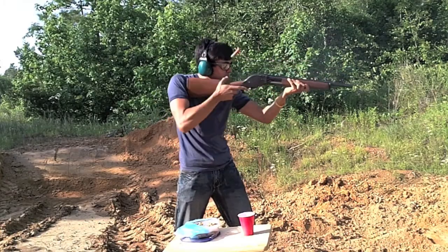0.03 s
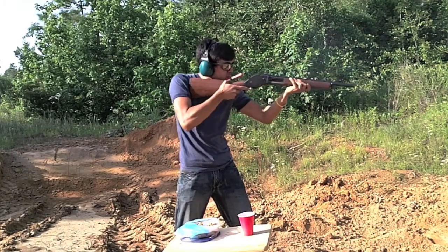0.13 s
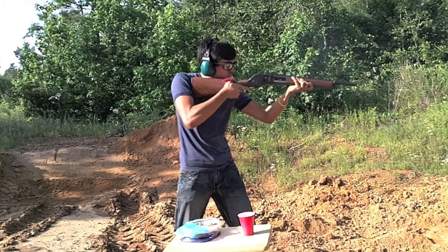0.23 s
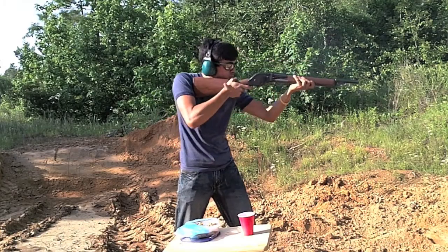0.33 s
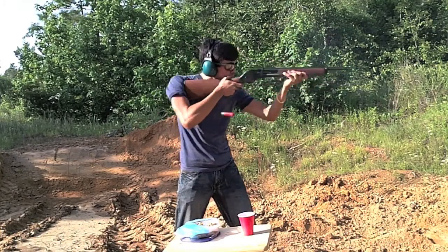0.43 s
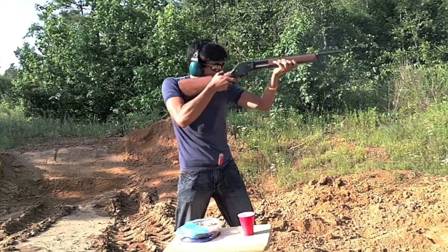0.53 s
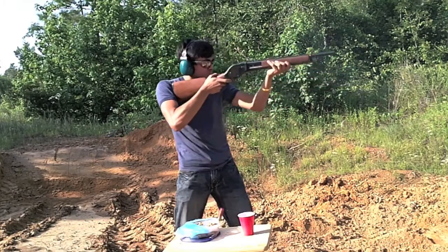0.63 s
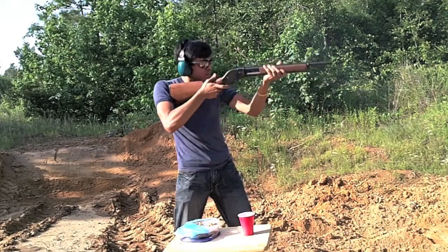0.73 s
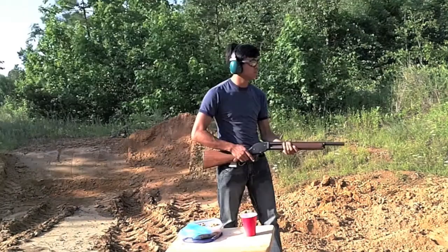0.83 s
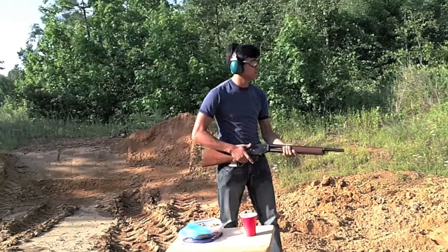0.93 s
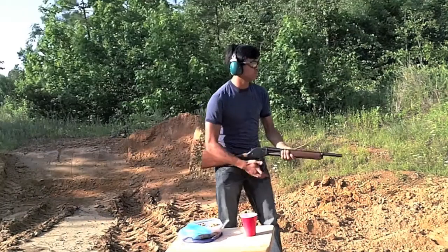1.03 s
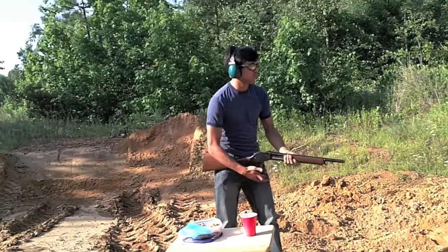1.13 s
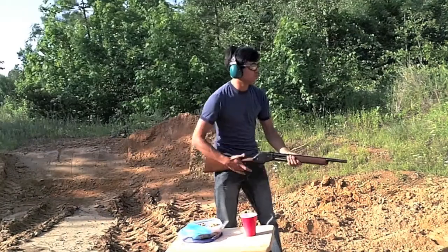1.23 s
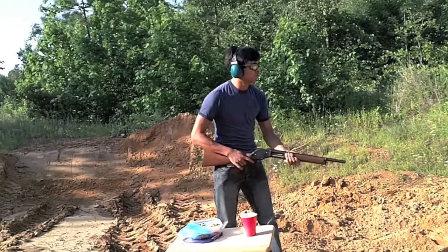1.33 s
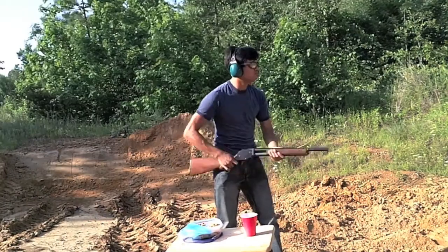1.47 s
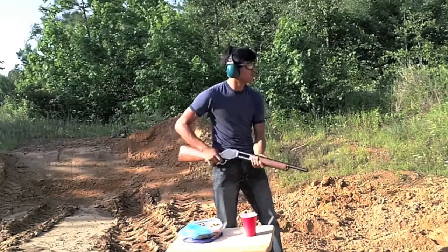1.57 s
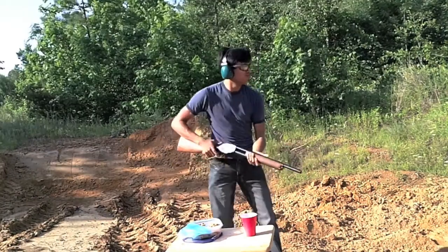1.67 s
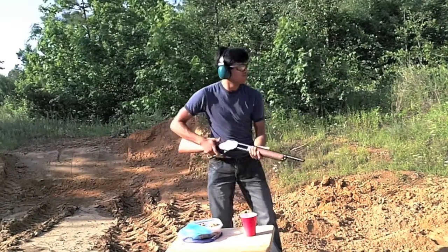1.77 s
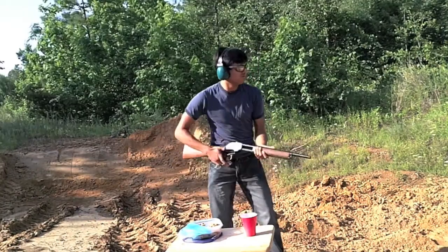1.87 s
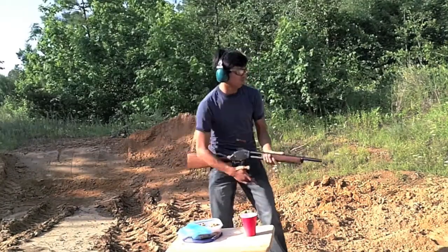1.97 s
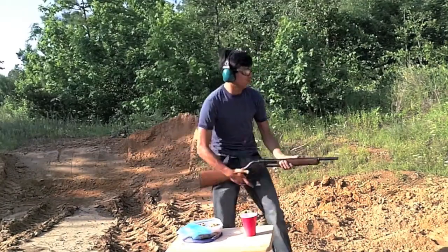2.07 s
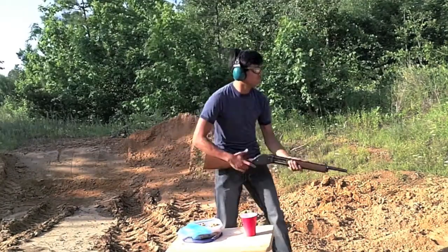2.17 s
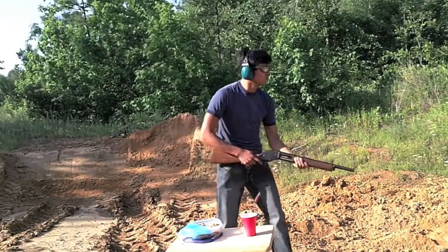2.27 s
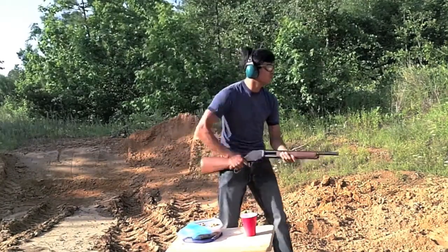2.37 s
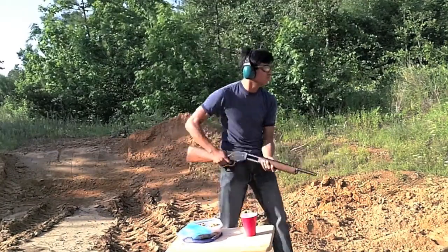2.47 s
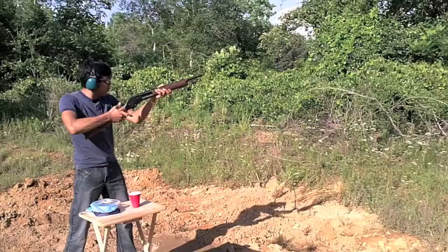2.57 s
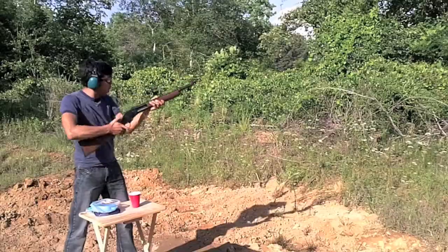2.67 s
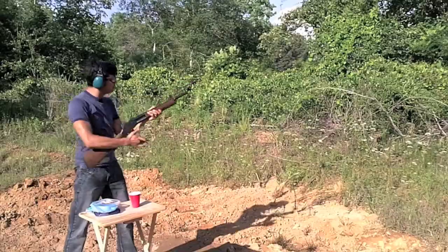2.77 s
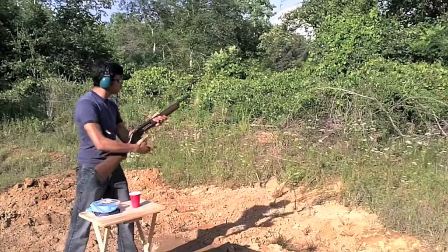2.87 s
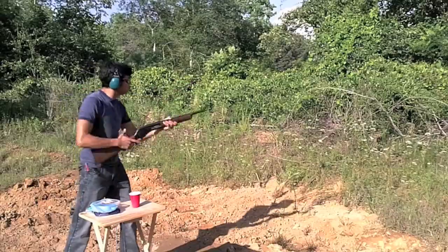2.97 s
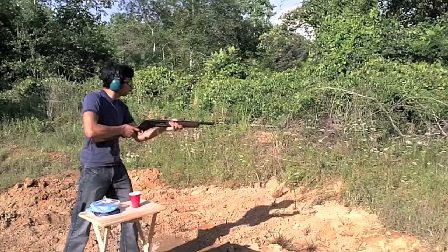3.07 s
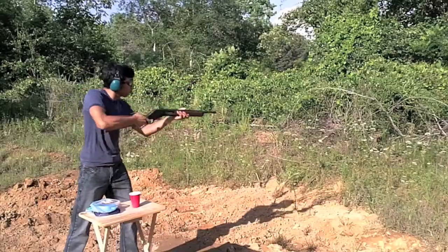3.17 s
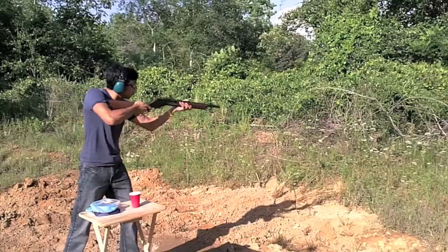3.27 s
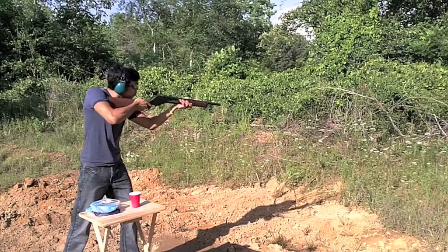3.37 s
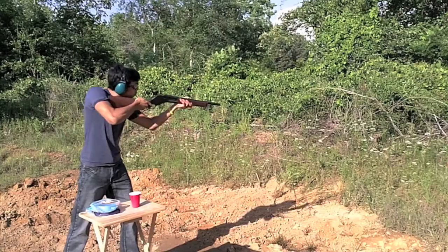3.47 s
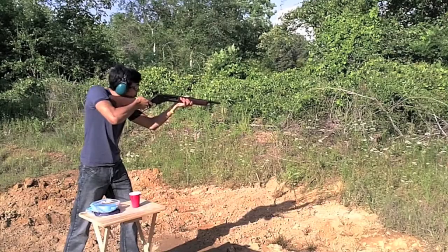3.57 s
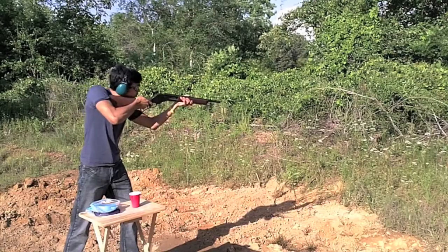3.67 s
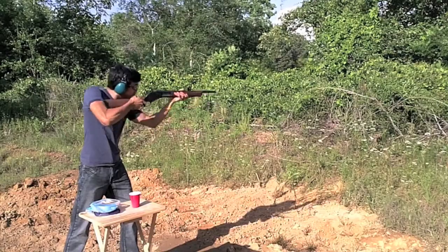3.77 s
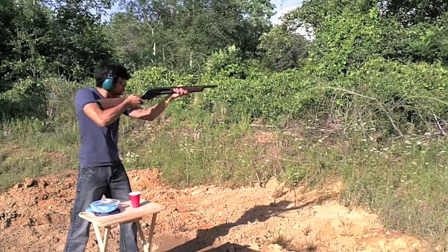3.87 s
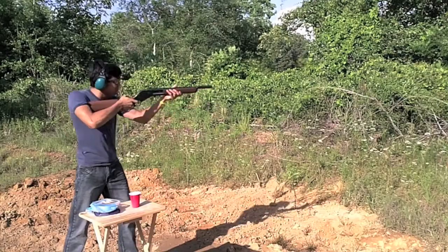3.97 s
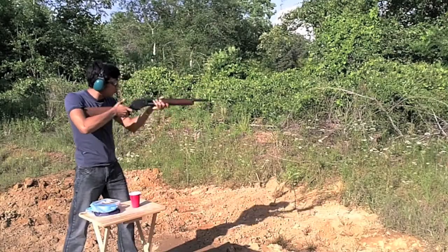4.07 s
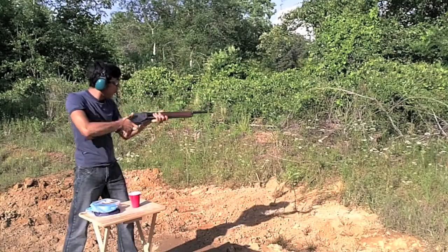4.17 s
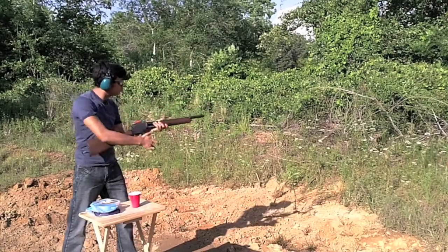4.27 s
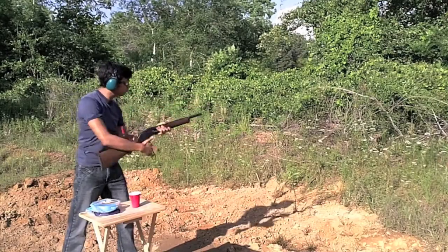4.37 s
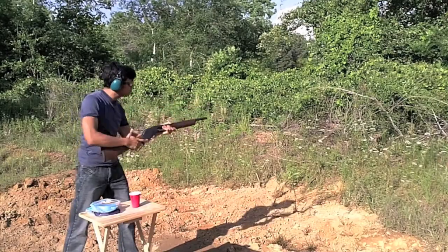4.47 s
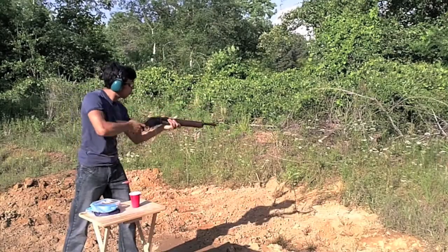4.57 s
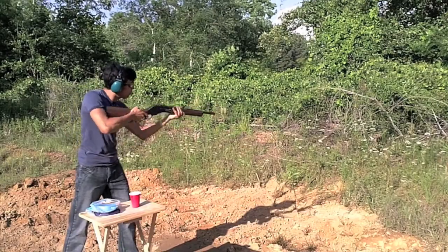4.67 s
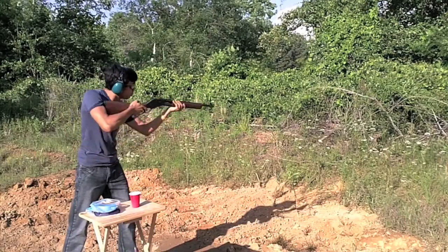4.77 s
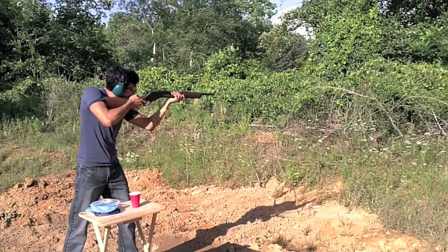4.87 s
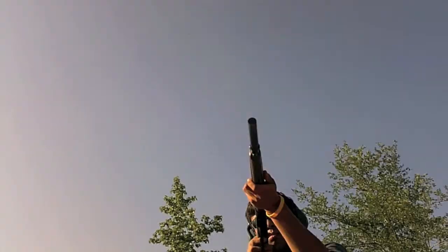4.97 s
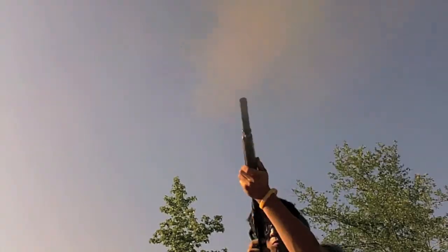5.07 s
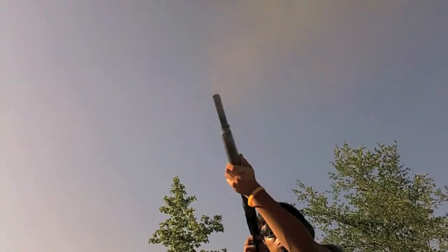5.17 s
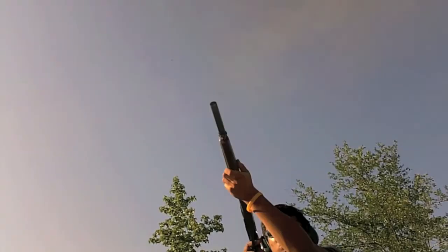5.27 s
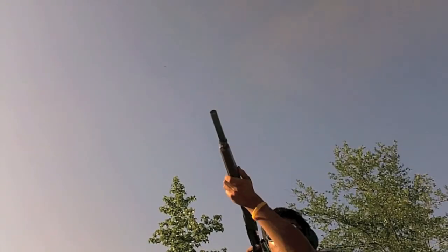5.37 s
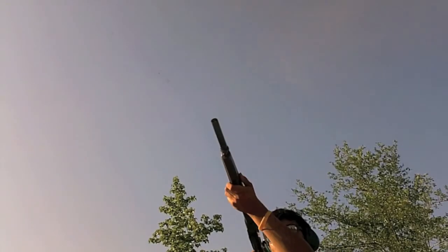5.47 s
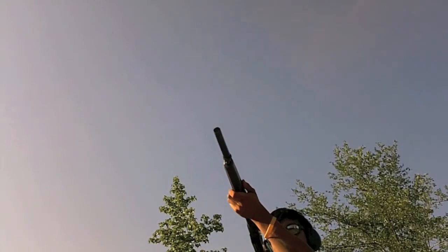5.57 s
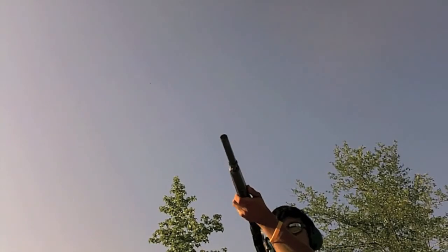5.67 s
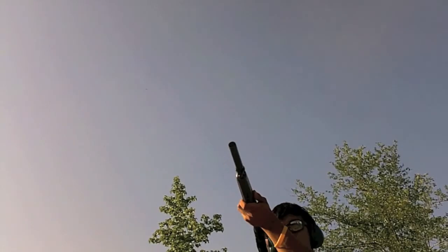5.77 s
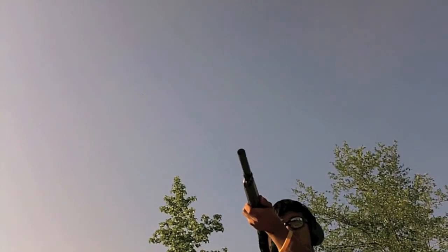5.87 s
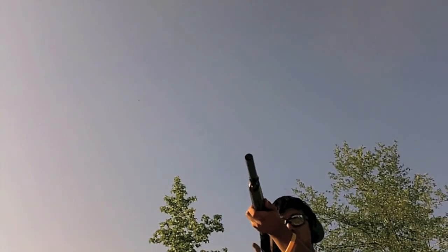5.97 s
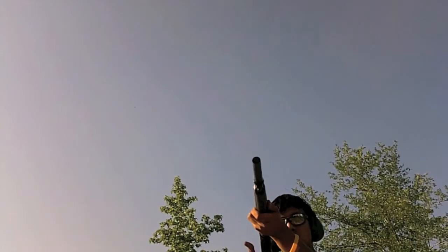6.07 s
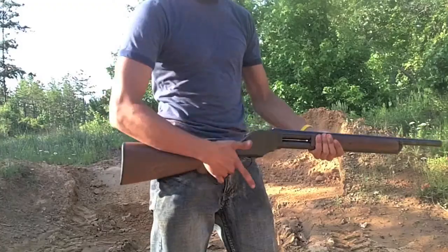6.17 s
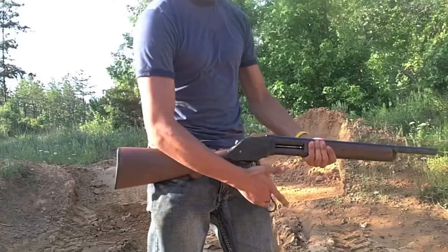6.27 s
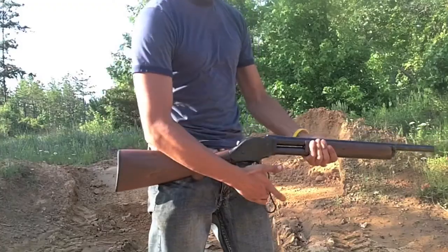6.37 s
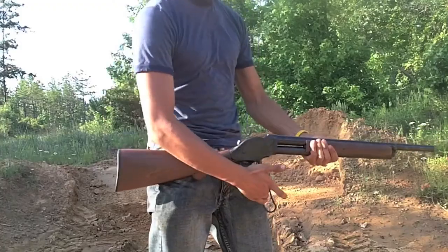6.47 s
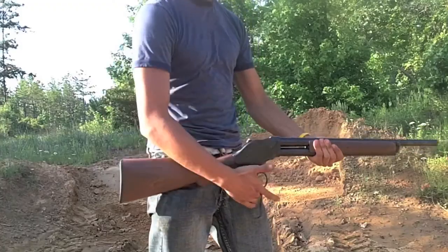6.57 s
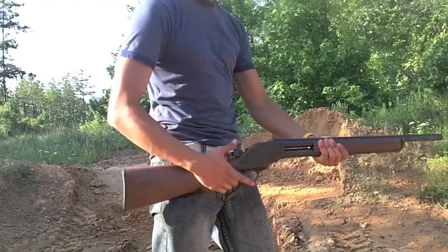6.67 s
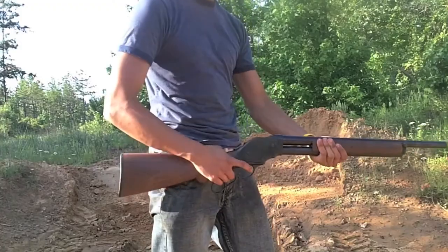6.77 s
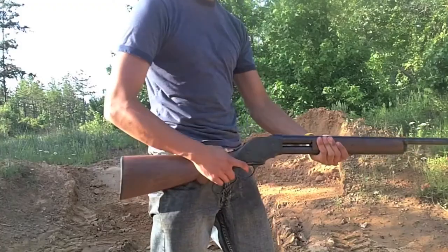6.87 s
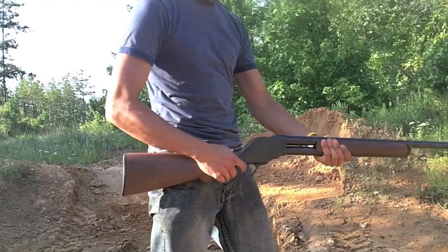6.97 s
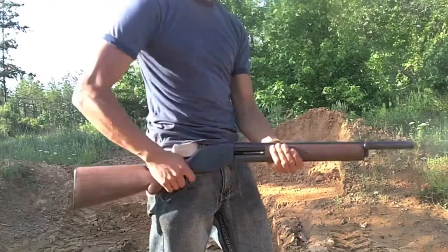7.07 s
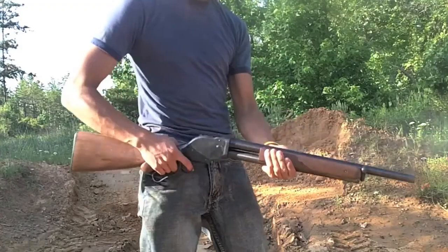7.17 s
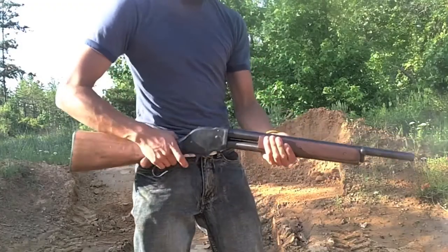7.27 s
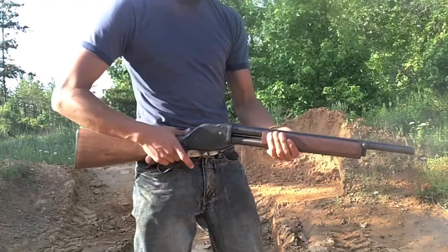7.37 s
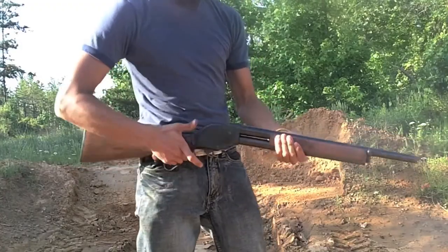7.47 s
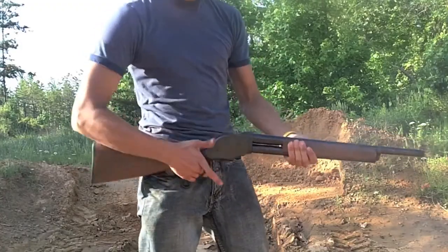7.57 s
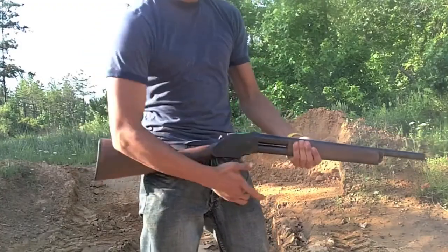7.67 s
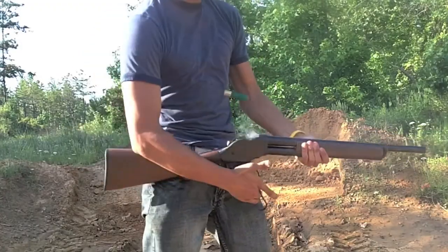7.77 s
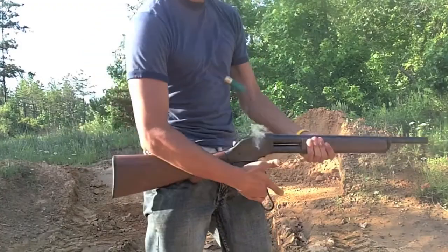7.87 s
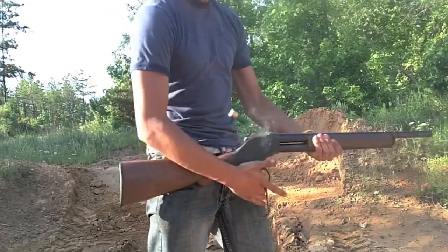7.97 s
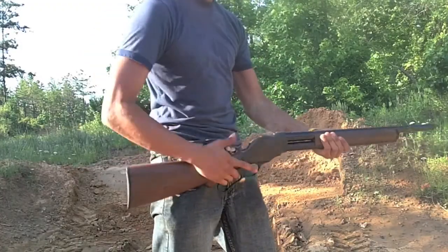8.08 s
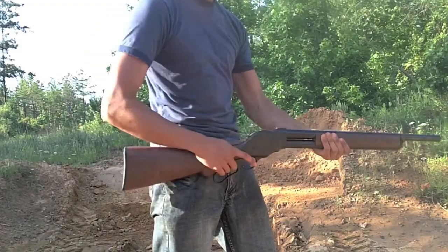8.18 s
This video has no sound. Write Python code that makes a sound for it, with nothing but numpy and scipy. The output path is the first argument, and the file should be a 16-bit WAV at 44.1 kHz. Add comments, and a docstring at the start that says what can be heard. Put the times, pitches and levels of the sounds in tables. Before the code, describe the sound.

Outdoors in a clearing, an earlier shot's echo fades as a lever clatters shut. A shotgun then fires six times about a second or two apart, each a clipped crack and boom followed by an echo swelling back from the trees and growing duller. Metallic clacks of the lever opening and closing fill the gaps, over rumble, light air and wind thumps on an overloaded microphone.

```python
"""The echo of an earlier shot rolls in the trees and a lever clatters shut; then a lever-action shotgun fires six times.
Each shot is shaped noise that overloads the microphone; its echo swells back from the trees, duller as it rolls away.
Between shots, bursts of force ring the gun's metal parts as the lever opens and shuts.
Gusts of low noise buffet the microphone over rumble, air, leaves and a faint tone; the level dips briefly four times."""
import sys
import numpy as np
from scipy import signal
from scipy.fft import rfft, irfft, next_fast_len
from scipy.io import wavfile
from scipy.ndimage import uniform_filter1d

SR = 44100
rng = np.random.default_rng(int(sys.argv[2]) if len(sys.argv) > 2 else 0)


def unload_audio(sound):
    """Save the sound as a 16-bit wav file, at the path given as the first command line argument."""
    columns = np.transpose(np.atleast_2d(sound))
    # keep every value between -1 and 1, then stretch to whole-number steps
    steps = np.round(np.clip(columns, -1, 1) * 32767)
    wavfile.write(sys.argv[1], SR, steps.astype(np.int16))


N = 362061
T = np.arange(N) / SR


def from_db(db):
    """Decibels to gain."""
    return 10 ** (np.asarray(db) / 20)


def rms_one(x):
    """Scale to rms 1."""
    return x / np.sqrt(np.mean(x ** 2) + 1e-20)


def at_hz(points, hz):
    """Read a spectrum in dB on a log-frequency axis."""
    freqs, db = np.transpose(points)
    return np.interp(np.log(np.maximum(hz, 1)), np.log(freqs), db)


def noise(spectrum):
    """Steady noise of a given colour, rms 1."""
    size = next_fast_len(N)
    gain = from_db(at_hz(spectrum, np.fft.rfftfreq(size, 1 / SR)))
    coloured = irfft(rfft(rng.standard_normal(size)) * gain, size)
    return rms_one(coloured[:N])


def bands(source, spectrum):
    """Colour a source and split it into half-octave bands that sum to rms 1; returns centres and bands."""
    centres_hz = np.geomspace(25, 18000, 20)
    hz = np.fft.rfftfreq(len(source), 1 / SR)
    coloured = rfft(source) * from_db(at_hz(spectrum, hz))
    parts = []
    for share in np.eye(len(centres_hz)):
        parts.append(irfft(coloured * np.interp(hz, centres_hz, share), len(source)))
    parts = np.array(parts)
    return centres_hz[:, None], parts / parts.sum(0).std()


def treble_share(hz, corner_hz=2500):
    """0 in the bass, 1 in the treble."""
    return 1 / (1 + (corner_hz / hz) ** 2) ** 2


def lowpass(x, hz):
    """A gentle second-order low-pass."""
    return signal.sosfilt(signal.butter(2, min(hz, .45 * SR), fs=SR, output="sos"), x)


def highpass(x, hz):
    """A gentle second-order high-pass."""
    return signal.sosfilt(signal.butter(2, hz, "high", fs=SR, output="sos"), x)


def resonate(x, modes):
    """Parallel two-pole resonances with alternating signs."""
    out = 0
    for k, (hz, width_hz, db) in enumerate(modes):
        r = np.exp(-np.pi * width_hz / SR)
        numerator = np.array([1, 0, -1]) * (1 - r * r) / 2
        denominator = [1, -2 * r * np.cos(2 * np.pi * hz / SR), r * r]
        out = out + (-1) ** k * from_db(db) * signal.lfilter(numerator, denominator, x + 1e-18)
    return out


def ringing(modes):
    """Half a second of free decay, one row per mode; a wider mode dies faster."""
    t = T[:SR // 2]
    rows = []
    for hz, width_hz, db in modes:
        rows.append(from_db(db) * np.exp(-np.pi * width_hz * t) * np.sin(2 * np.pi * hz * t))
    return np.array(rows)


def add(track, s, sound):
    """Mix a sound into the track at time s."""
    start = int(round(s * SR))
    sound = sound[max(-start, 0):max(N - start, 0)]
    track[max(start, 0):max(start, 0) + len(sound)] += sound


def boom(hz, peak_s=0.02):
    """A few slow pressure swings of moving gas or air."""
    t = T[:SR // 8]
    swell = (t / peak_s * np.exp(1 - t / peak_s)) ** 4
    return swell * np.sin(2 * np.pi * hz * t)


# Background levels, steady within each row. Each row: start in seconds, distant rumble, air and leaves in dB.
BACKGROUND_LEVELS = [(0, -45, -43.5, -71), (.804, -36, -57, -54), (2.567, -48, -47, -60.5),
                     (4.946, -46.5, -77, -70.5), (6.111, -52, -57.5, -69)]
# Colours of the three layers. Each row: frequency in Hz, relative density in dB per Hz.
RUMBLE_SPECTRUM = [(20, 0.5), (50, 4.5), (95, 3.5), (160, -7), (300, -15), (900, -44)]
AIR_SPECTRUM = [(100, -10.5), (350, -6), (900, -1), (1500, -7.5), (2300, -14.5), (5000, -30.5),
                (15000, -43)]
LEAVES_SPECTRUM = [(1000, -15), (3000, -6), (4400, 0), (6000, -10), (9000, -34.5), (15000, -31.5)]
# Faint far tone. Each row: frequency in Hz, rms level in dB.
FAR_TONE = [(710.6, -71), (1421, -66)]


def clearing(hiss_db=-85):
    """Distant rumble, moving air and leaves as coloured noise; a far tone as sines; white hiss."""
    starts_s, *levels_db = np.transpose(BACKGROUND_LEVELS)
    row = np.searchsorted(starts_s[1:], T)
    out = hiss_db_noise = from_db(hiss_db) * rng.standard_normal(N)
    for db, spectrum in zip(levels_db, (RUMBLE_SPECTRUM, AIR_SPECTRUM, LEAVES_SPECTRUM)):
        out = out + from_db(db)[row] * noise(spectrum)
    for hz, db in FAR_TONE:
        out = out + from_db(db) * np.sqrt(2) * np.sin(2 * np.pi * hz * T)
    return out


# Bell-shaped gusts. Each row: peak in seconds, half-width to 1/e in seconds, rumble and flutter in dB before pickup.
GUSTS = [(.86, 0.042, -19, -50), (1.01, 0.034, -16, -30.5), (1.067, .015, -21, -22.5),
         (1.18, .06, -35, -39), (1.396, 0.027, -31, -27.5), (1.512, 0.047, -27, -28), (1.9, 0.17, -24, -30),
         (2.191, 0.056, -36, -62), (2.39, 0.027, -28.5, -35), (5.302, 0.046, -40, -22),
         (5.51, 0.043, -22, -25), (5.66, 0.027, -45.5, -30.5), (5.76, .03, -27, -39),
         (5.92, 0.085, -37, -52)]
# Colours of the two gust parts. Each row: frequency in Hz, relative density in dB per Hz.
GUST_RUMBLE_SPECTRUM = [(20, -3), (50, -5.5), (110, 0.5), (160, -2.5), (250, -37), (500, -69)]
GUST_FLUTTER_SPECTRUM = [(80, -30.5), (170, 2), (280, -5.5), (450, -14.5), (700, -25.5), (2000, -78)]
# Single eddies that thump the microphone. Each row: start in seconds, level in dB, frequency in Hz.
EDDIES = [(0.936, -8.5, 40), (0.975, -17, 105), (1.006, -25, 87), (1.377, -22.5, 142), (1.484, -23, 193),
          (2.365, -23, 40.7)]


def wind(rumble_pickup_db=-0.5, flutter_pickup_db=-0.5):
    """Gusts on the microphone: a deep rumble, a higher flutter when they are sharp, and single thumps."""
    rumble = flutter = 0
    for s, width_s, rumble_db, flutter_db in GUSTS:
        swell = np.exp(-((T - s) / width_s) ** 2)
        rumble = rumble + from_db(rumble_db) * swell
        flutter = flutter + from_db(flutter_db) * swell
    out = from_db(rumble_pickup_db) * rumble * noise(GUST_RUMBLE_SPECTRUM)
    out = out + from_db(flutter_pickup_db) * flutter * noise(GUST_FLUTTER_SPECTRUM)
    for s, db, hz in EDDIES:
        add(out, s, from_db(db) * boom(hz))
    return out


def shifted(modes, pitch=1):
    """The resonances move with the position of the lever, and a little by chance with the point of contact."""
    moved = []
    for hz, width_hz, db in modes:
        moved.append((hz * pitch * rng.uniform(.96, 1.04), width_hz, db + rng.uniform(-3, 3)))
    return moved


# Five contacts of every throw. Each row: share of the travel 0-1, body in dB, treble re body in dB,
# rattle decay in seconds before the throw's length ratio, pitch ratio of the receiver.
OPENING_CONTACTS = [(0, 1.5, -8, .008, 1.01), (0.236, -4, 1, .011, 1.04), (.5, -5.5, 5.5, .008, .99),
                    (0.746, 1.5, 1, 0.0058, 1.01), (1, 1, -0.5, 0.003, 1.12)]
CLOSING_CONTACTS = [(0, -10.5, -6.5, 0.013, 1.01), (.5, 4, -4, 0.007, 1.008), (.735, -2.5, 1.5, .009, .94),
                    (.92, 1, -4, .004, 1.017), (1.002, -3, 3.5, 0.0073, 1.05)]
# Lever throws. Each row: start in seconds, time to halfway in seconds, length in seconds, level in dB, treble in dB,
# first contact in dB, last contact in dB, growth over the throw in dB, rattle length ratio.
OPENING_THROWS = [(1.073, .045, .083, -11.5, -1, 2.5, 0.5, -1, 1),
                  (1.961, 0.05, .084, -16.5, 1.5, 2, 3.5, 2, 0.95),
                  (2.694, 0.067, 0.11, -19, 0, 2.5, 1, 8, 1.1),
                  (4.175, .046, 0.096, -17, -0.5, 0.5, -1.5, -1, 1.5),
                  (6.299, .038, .079, -9.5, -13.5, 2, 3, 2, 1.13),
                  (7.691, 0.053, .0965, -6.5, -14.5, 5.5, 5, 3.5, 0.67)]
CLOSING_THROWS = [(.039, 0.046, .097, -13, -4, -1, 0.5, 1.5, 1.1),
                  (1.222, 0.053, 0.11, -12.5, -4.5, 4, 1.5, -1, 1.2),
                  (2.098, 0.046, .1, -13.5, -2.5, 7, -3.5, -0.5, 1.24),
                  (2.857, 0.045, 0.11, -11, -5.5, -10, 1, -10, 1.22),
                  (4.345, .048, .103, -10.5, -7, -9, 2.5, -3, 1.16),
                  (6.666, .048, 0.12, -6.5, -16.5, -13, -2, 4.5, 1),
                  (8.07, .054, .113, -7, -17.5, 0, -3.5, 2.5, 0.97)]
# Single clicks as the gun is handled. Each row: time in seconds, body in dB, treble re body in dB,
# rattle decay in seconds.
CLICKS = [(.2415, -19.5, 7.5, 0.0022), (.323, -29, -13, .005), (0.858, -18.5, -18, .0031),
          (3.176, -36.5, -5, .0044), (3.271, -31.5, -11, 0.0043), (4.479, -28, 1.5, 0.019),
          (4.503, -28, 5, .008), (6.244, -30.5, -21, .0044), (6.278, -30.5, -33, 0.0027),
          (7.007, -27.5, -26, 0.0046)]


def contacts():
    """Each throw plays its contacts at its own pace and force: s, body dB, treble dB, rattle decay s, pitch ratio."""
    rows = []
    for throws, pattern in ((OPENING_THROWS, OPENING_CONTACTS), (CLOSING_THROWS, CLOSING_CONTACTS)):
        for start_s, halfway_s, length_s, db, treble_db, first_db, last_db, growth_db, looseness in throws:
            for k, (travel, contact_db, contact_treble_db, decay_s, pitch) in enumerate(pattern):
                s = start_s + np.interp(travel, [0, .5, 1], [0, halfway_s, length_s])
                force_db = db + growth_db * (travel - .5)
                force_db += first_db * (k == 0) + last_db * (k == len(pattern) - 1)
                rows.append((s, force_db + contact_db, treble_db + contact_treble_db,
                             decay_s * looseness, pitch))
    return rows + [(*click, 1) for click in CLICKS]


def contact_force(t, decay_s, strike_db=11, grain_db=1.0, slide_db=-19, slide_stretch=2.9):
    """Rough sliding before t = 0, one sharp strike, then a decaying rattle."""
    age = abs(t) / max(decay_s, .0005)   # a loose contact slides in slowly, a snap comes at once
    push = np.where(t < 0, from_db(slide_db) * np.exp(-age / slide_stretch), np.exp(-age))
    grain = np.repeat(rng.standard_normal(len(t)), 20)[:len(t)]
    force = push * rng.standard_normal(len(t)) * from_db(grain_db * grain)
    force *= np.linalg.norm(push) / np.linalg.norm(force)
    force[np.argmax(t >= 0)] += from_db(strike_db)
    return force


# Receiver and stock, before shifts. Each row: frequency in Hz, width in Hz, level in dB.
BODY_MODES = [(437, 640, -17.5), (850, 170, -3), (1205, 100, -3), (1266, 270, -6), (1560, 198, 6.5),
              (1787, 317, 3.5), (2025, 480, -3)]
# Bolt and lever, before shifts. Each row: frequency in Hz, width in Hz, level in dB.
STEEL_MODES = [(2840, 400, 4.5), (4090, 380, 6), (4170, 850, 3.5), (4624, 420, 8), (5970, 1300, -7.5),
               (7000, 650, -3.5), (8600, 3000, -13), (12200, 4600, -16.5)]
# Small springs and pins shaken by the rattle. Each row: frequency in Hz, width in Hz, level in dB before the shake.
SPRING_MODES = [(6218, 18, -49), (6950, 18, -40), (9090, 19, -43), (9950, 60, -42), (13220, 34, -47)]
# Light metallic ping as the action shuts, its close modes beating. Each row: frequency in Hz, width in Hz, level in dB.
PING_MODES = [(4226, 6, -52), (6982, 10, -57), (9092, 9, -59), (11630, 8, -41), (11685, 9, -44)]


def action(body_db=7, steel_db=6, ring_spread_db=14, full_ring_rattle_s=.008, ping_s=2.167):
    """Parts slide into each contact, strike and rattle; this rings the receiver, the bolt and the small springs."""
    lead_s = .02
    t = T[:SR // 10] - lead_s
    out = np.zeros(N)
    springs = ringing(SPRING_MODES)
    for s, db, treble_db, decay_s, pitch in contacts():
        force = contact_force(t, decay_s)
        body = from_db(body_db) * resonate(force, shifted(BODY_MODES, pitch))
        steel = from_db(steel_db) * resonate(force, shifted(STEEL_MODES))
        add(out, s - lead_s, from_db(db) * (body + from_db(treble_db) * steel))
        # a short snap hardly shakes the springs
        shake = from_db(db + .5 * treble_db) * np.sqrt(abs(decay_s) / full_ring_rattle_s)
        spread = from_db(ring_spread_db * rng.random(len(SPRING_MODES)))
        add(out, s, (shake * spread) @ springs)
    add(out, ping_s, ringing(PING_MODES).sum(0))
    return out


def scatter(x, near_db=-12, near_t60_s=0.14, far_db=-25, far_t60_s=0.52, dull_hz=4500):
    """Ground and bushes give small sounds a short tail, the trees a faint long one."""
    t = T[:SR // 2]
    tail = 0
    for db, t60_s in ((near_db, near_t60_s), (far_db, far_t60_s)):
        returns = rng.standard_normal(len(t)) * from_db(-60 * t / t60_s)
        tail = tail + from_db(db) * returns / np.linalg.norm(returns)
    return x + signal.fftconvolve(x, lowpass(tail, dull_hz))[:N]


# Colour of the echo. Each row: frequency in Hz, relative density in dB per Hz.
ECHO_SPECTRUM = [(30, -25), (70, 0.5), (130, 4.5), (220, -6), (360, -7.5), (600, -4.5), (1000, -0.5),
                 (2000, -4), (3200, -5.5), (4400, -5), (6300, -16), (9000, -21.5), (14000, -30.5)]
# Strength of the returns from the trees. Each row: seconds after the shot before stretch, relative level in dB.
ECHO_SWELL = [(0, 14.5), (.05, -6), (.1, -6), (.16, 4), (.23, 6), (.32, 1), (.5, -3.5), (.75, -10),
              (1.1, -30), (2.0, -58.5)]


def echo(treble_db, bass_db, stretch, trunks_per_s=140, trunk_db=16, clumps_db=2.4, air_db_per_s_khz=6.5):
    """Foliage returns a dense wash, trunks single slaps; longer paths lose more treble to the air."""
    t = np.arange(2 ** 16 + 2 ** 14) / SR
    slaps = (rng.random(len(t)) < trunks_per_s / SR) * rng.standard_normal(len(t))
    hz, parts = bands(rng.standard_normal(len(t)) + from_db(trunk_db) * slaps, ECHO_SPECTRUM)
    high = treble_share(hz)
    colour_db = treble_db * high + bass_db * (1 - treble_share(hz, corner_hz=300))
    # the trees stand in clumps, so the echo surges, most in its lows and mids
    surge = rms_one(uniform_filter1d(rng.standard_normal(len(t)), size=500))
    surge_db = clumps_db * surge * (1 - .5 * high)
    air_loss_db = air_db_per_s_khz * hz / 1000 * t
    swell_db = np.interp(t / stretch, *np.transpose(ECHO_SWELL))
    return (parts * from_db(colour_db + surge_db - air_loss_db)).sum(0) * from_db(swell_db)


def slap(corner_hz, decay_s, lowest_hz=130):
    """A short, dulled burst thrown back by one hard surface."""
    t = T[:SR // 10]
    burst = lowpass(rng.standard_normal(len(t)), corner_hz)
    return rms_one(highpass(burst, lowest_hz)) * np.exp(-t / decay_s)


# Colour of the blast. Each row: frequency in Hz, relative density in dB per Hz.
BLAST_SPECTRUM = [(30, -8), (80, -2.5), (160, -1.5), (340, 0), (700, -5.5), (1200, -6), (2000, -8),
                  (3000, -9.5), (4200, -11), (6300, -30.5), (9000, -29.5), (14000, -32.5)]


def blast(treble_db, bass_db, length_s, lowest_hz, crack_rise_s=0.00063, bass_lag_s=.012,
          treble_fall_db=11, body_fall_db=4, mid_fall_db=4, die_s=0.013):
    """The muzzle wave and its scatter off the ground: the crack comes first, the bass builds, then all collapses."""
    t = np.arange(2 ** 13) / SR
    hz, parts = bands(rng.standard_normal(len(t)), BLAST_SPECTRUM)
    high = treble_share(hz)
    low = 1 - treble_share(hz, corner_hz=240.2)
    rise = 1 - np.exp(-t / (crack_rise_s + bass_lag_s * low))
    spent = np.interp(t / length_s, [.28, .75], [0, 1])
    fall_db = -(body_fall_db + mid_fall_db * (1 - low) + treble_fall_db * high) * spent
    collapse = np.exp(-np.maximum(t - length_s, 0) / (die_s * (1 + 1.6 * high)))
    gain = from_db(treble_db * high + bass_db * low + fall_db)
    return highpass((parts * rise * gain * collapse).sum(0), lowest_hz)


# Shots. Each row: start in seconds, blast in dB, blast treble in dB, blast bass in dB, blast length in seconds,
# boom in Hz, boom in dB, echo in dB, echo treble in dB, echo bass in dB, echo time stretch ratio,
# bank return in dB, bank dullness corner in Hz, lowest frequency of the blast in Hz.
SHOTS = [(0.5057, -0.5, 4.5, 0, 0.028, 165.3, -10, -29.5, 5, 2.5, 0.76, -15.5, 6000, 12),
         (1.565, -3.5, 6, 2.5, 0.029, 163.6, -13, -22.5, 2.5, -5.5, 1.244, -23, 5000, 20),
         (2.4318, -1.5, 6, 0.5, 0.028, 161, -12, -25.5, -7.5, -4, 1.25, -15, 5000, 41),
         (3.7346, -1.5, 6.5, 6, 0.019, 154, -7.5, -20.5, -0.5, -5, 1.283, -19, 6000, 18),
         (5.112, 7, -12.5, 2.5, 0.0084, 228, -10.5, -25.5, -6, 2.5, 1.152, -7, 900, 90),
         (7.0765, 0.5, 1.5, 9, 0.019, 314, -21, -22, -11.5, -4, 1.196, -10, 600, 15)]
# Hard returns that stand out of the echo. Each row: start in seconds, level in dB, dullness corner in Hz,
# decay in seconds.
HARD_RETURNS = [(0.7014, -18, 3500, 0.018), (1.8554, -16, 1910, .0033), (4.025, -24.5, 2940, 0.0022),
                (5.1651, -15, 320, 0.022), (5.485, -9.5, 200, 0.0046), (7.32, -24, 2480, 0.0044)]


def gunfire(earlier_shot_s=-0.68, earlier_echo_db=-16.5, earlier_treble_db=-6.5,
            bank_delay_s=.0255, bank_decay_s=0.0031):
    """Every shot is a blast, a boom, a slap off the earth bank and an echo; a few hard returns stand out."""
    out = np.zeros(N)
    add(out, earlier_shot_s, from_db(earlier_echo_db) * echo(earlier_treble_db, 0, 0.84))
    for (s, db, treble_db, bass_db, length_s, boom_hz, boom_db, echo_db, echo_treble_db, echo_bass_db,
         stretch, bank_db, bank_hz, lowest_hz) in SHOTS:
        add(out, s, from_db(db) * blast(treble_db, bass_db, length_s, lowest_hz))
        add(out, s, from_db(boom_db) * boom(boom_hz))
        add(out, s + bank_delay_s, from_db(bank_db) * slap(bank_hz, bank_decay_s))
        add(out, s, from_db(echo_db) * echo(echo_treble_db, echo_bass_db, stretch))
    for s, db, corner_hz, decay_s in HARD_RETURNS:
        add(out, s, from_db(db) * slap(corner_hz, decay_s))
    return out


def scene():
    """Background, wind, action and gun at one microphone."""
    return (clearing() + wind() + scatter(action()) + gunfire())[None]


# Notches of the microphone housing. Each row: frequency in Hz, width in Hz.
HOUSING_NOTCHES = [(2730, 980), (5500, 1160), (7900, 2770), (10950, 1650)]
# Brief level dips. Each row: lowest point in seconds, fade-out in seconds, fade-in in seconds, depth in dB.
LEVEL_DIPS = [(0.803, 0.048, 0.45, -42), (2.567, 0.058, 0.051, -46), (4.946, 0.12, 0.17, -36.5),
              (6.111, 0.083, 0.14, -32.5)]


def record(dry, overload_level=.93, stopband_hz=16500):
    """The housing cuts notches, the blasts overload, the level dips briefly, the top is cut."""
    out = dry
    for hz, width_hz in HOUSING_NOTCHES:
        out = signal.lfilter(*signal.iirnotch(hz, hz / width_hz, fs=SR), out)
    out = overload_level * np.tanh(out / overload_level)
    for s, out_s, in_s, depth_db in LEVEL_DIPS:
        ramp = np.maximum((s - T) / out_s, (T - s) / in_s)
        out = out * np.clip(ramp, min(from_db(depth_db), 1), 1)
    return signal.sosfilt(signal.cheby2(14, 70, stopband_hz, fs=SR, output="sos"), out)


dry = scene()
out = record(dry)
unload_audio(out)
```